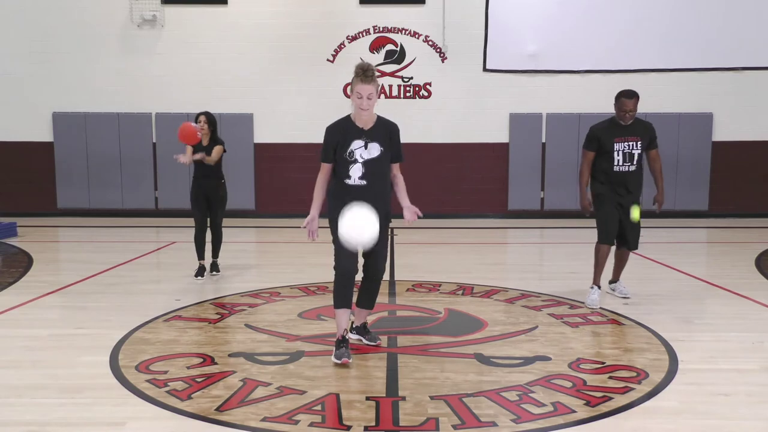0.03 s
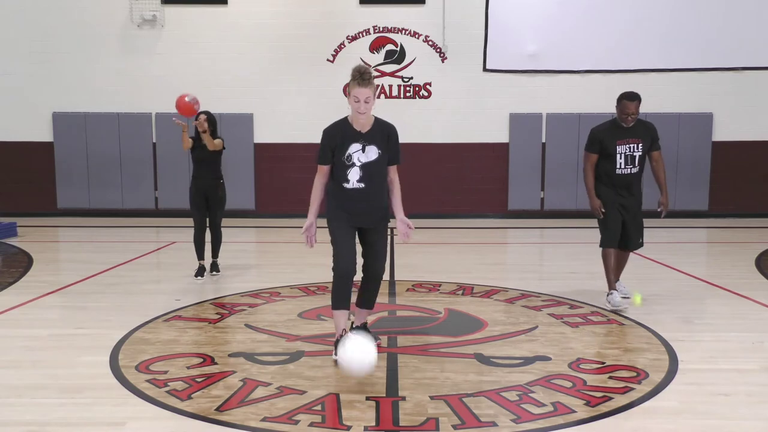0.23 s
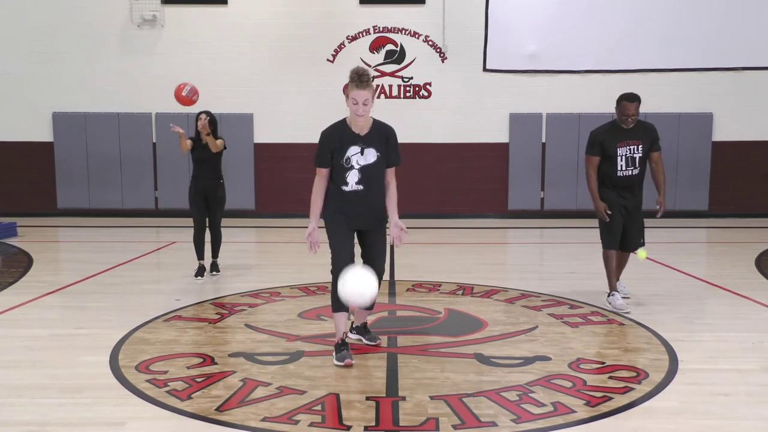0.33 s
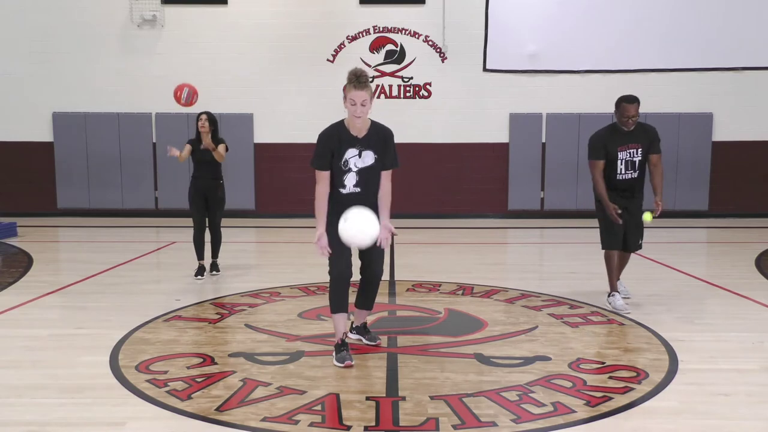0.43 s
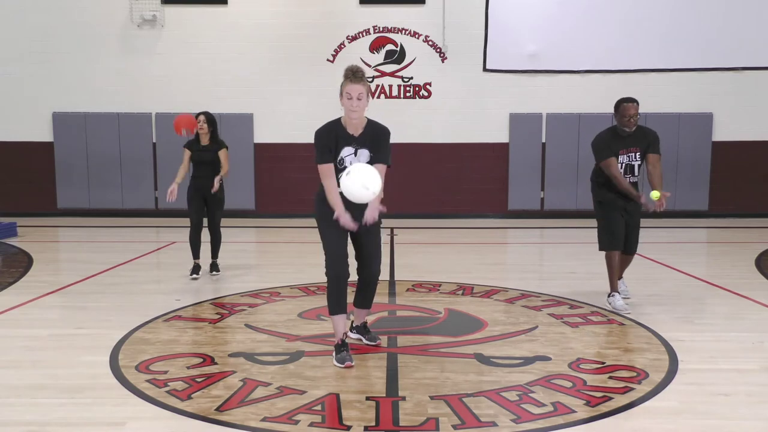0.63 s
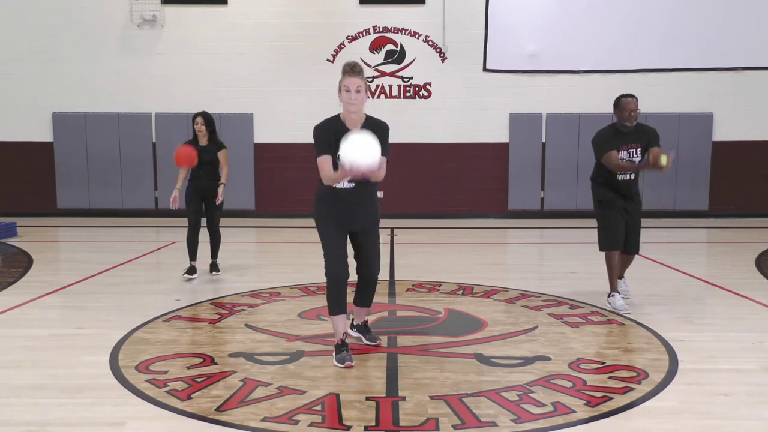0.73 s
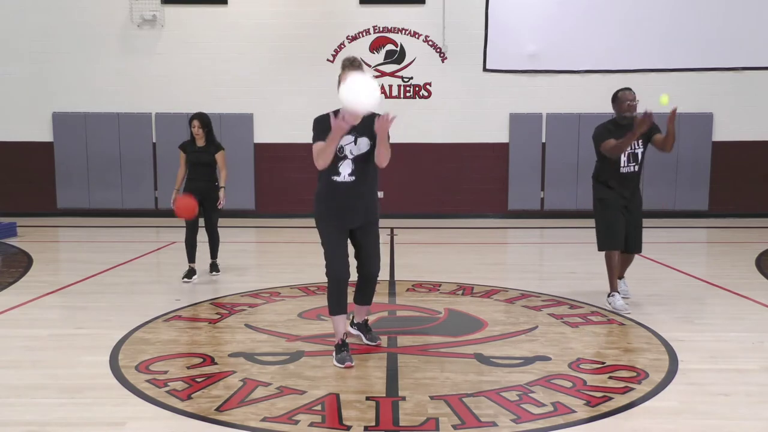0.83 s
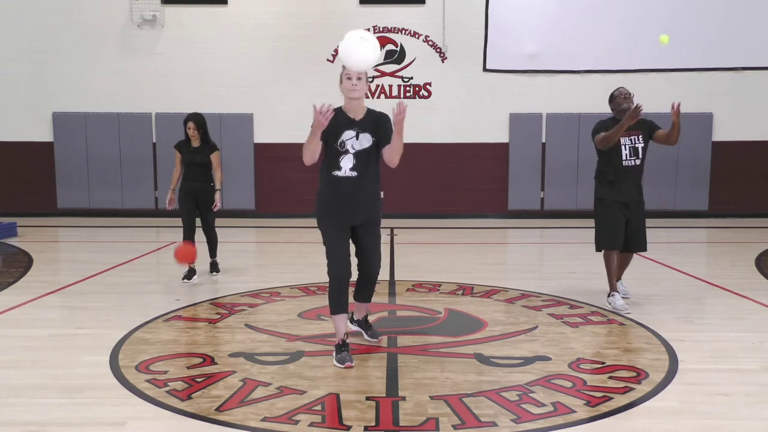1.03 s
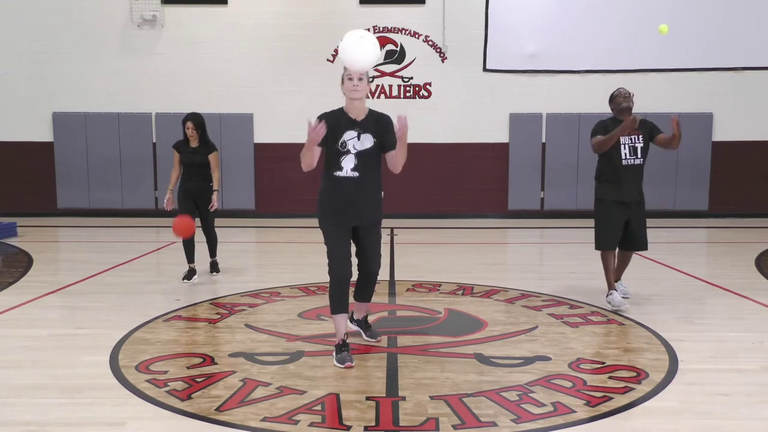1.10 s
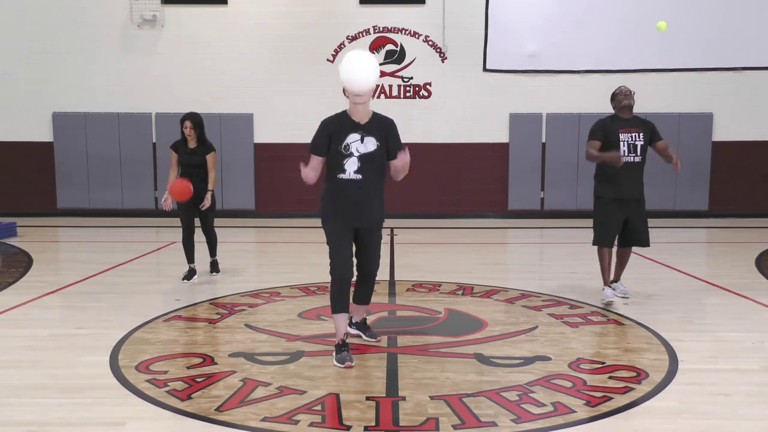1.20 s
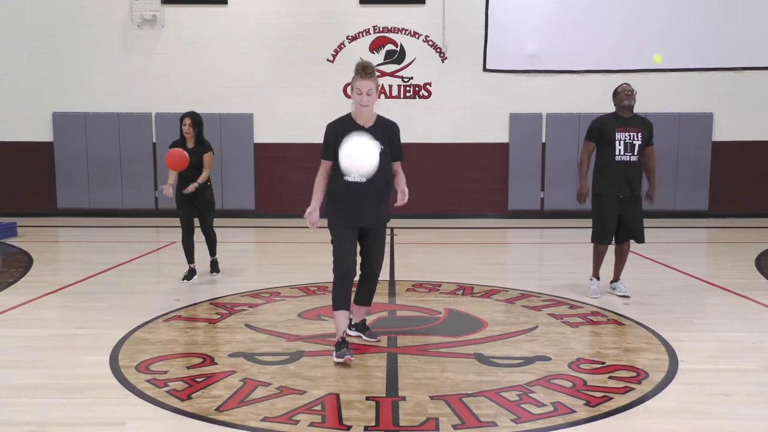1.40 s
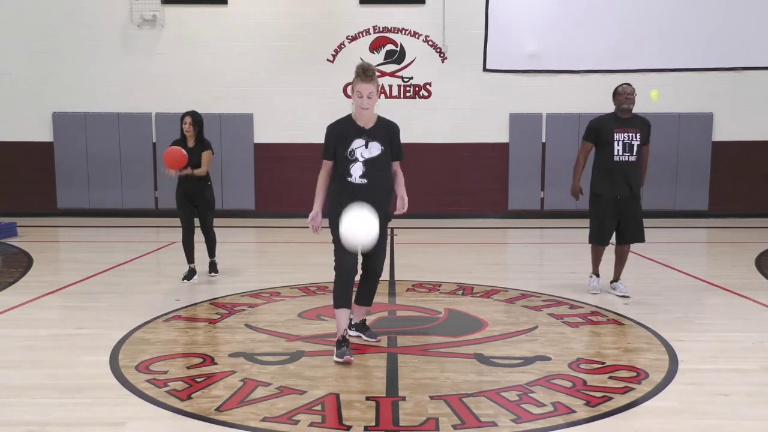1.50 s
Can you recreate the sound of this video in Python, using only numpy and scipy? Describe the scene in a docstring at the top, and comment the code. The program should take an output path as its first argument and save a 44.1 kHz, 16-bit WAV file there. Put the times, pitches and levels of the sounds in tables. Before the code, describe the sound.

Ball bounces in a large, echoing gym: a small tap runs straight into a loud, close thump, then a sharp two-handed catch near the microphone, and finally a deep, farther bounce with a long boomy tail.

```python
"""A gym hall hums faintly, with a hiss, short shoe squeaks and a very soft touch of a hand on a ball.
A small ball bounces on the sprung wooden floor, then at once a large near one; two hands catch a ball
close to the microphone, a far ball bounces, and a last soft touch follows.
Each blow is a noise crack plus fading tones. The hall adds slap echoes (smeared cracks), a low boom
(wavering tones and noise) and a wash (coloured noise that grows duller)."""
import sys
import numpy as np
from scipy import signal
from scipy.fft import rfft, irfft
from scipy.io import wavfile
from scipy.ndimage import uniform_filter1d

SR = 44100
rng = np.random.default_rng(int(sys.argv[2]) if len(sys.argv) > 2 else 0)


def output_pcm(signal):
    """Save a mono or channel-first signal as 16-bit PCM at the path in sys.argv[1].

    Samples are clipped to [-1, 1] before scaling.
    """
    pcm = np.clip(np.atleast_2d(signal).T, -1, 1) * 32767
    wavfile.write(sys.argv[1], SR, np.round(pcm).astype(np.int16))


N = 68355  # length of the scene [samples]

# Levels are those before the microphone. A crack level is a setting for the burst before its colour:
# crack() also scales the burst by how long it lasts.

# hall boom in four stretches, each a list of
# (time [s], middle level [dB], low level [dB], upper bass level [dB], middle pitch [Hz])
BOOM_STRETCHES = [
    [(0.0, -55.5, -60, -78, 139.2), (0.02, -50.5, -71, -62, 140.5), (0.032, -91, -68, -81, 138),
     (0.04, -75, -61, -75, 139), (0.064, -82, -65, -82, 137.4), (0.082, -95, -82, -95, 143),
     (0.092, -63, -64, -66, 143.5), (0.104, -61, -59, -60, 140), (0.114, -61, -87, -77, 145),
     (0.124, -85, -62.5, -65.5, 144), (0.156, -57.5, -68, -77, 141), (0.18, -68.5, -82, -66, 144)],
    [(0.25, -24.5, -61, -37.5, 137.7), (0.274, -41.5, -60, -53, 129.4), (0.31, -46.5, -50, -52, 150.8),
     (0.326, -44, -50, -64, 142), (0.346, -33.5, -54, -46.5, 145), (0.366, -55, -52, -49.5, 140.6),
     (0.39, -38, -33, -55.5, 148.2), (0.408, -33.5, -68, -51.5, 159.8), (0.428, -54.5, -53, -55.5, 153.6),
     (0.518, -34.5, -43.5, -52.5, 136.8), (0.558, -92, -59, -73, 127.8), (0.578, -60.5, -49, -50, 138),
     (0.596, -46.5, -53, -70.5, 145), (0.64, -55.5, -61, -55.5, 137)],
    [(0.71, -38.5, -59, -42.5, 157.3), (0.736, -54, -64, -67.5, 154), (0.776, -58.5, -49.5, -66, 135.7),
     (0.796, -79.5, -92, -80, 139), (0.814, -53, -67, -86, 149.8), (0.834, -65, -94, -83, 147),
     (0.852, -66.5, -87, -72, 150), (0.91, -70, -66, -100.5, 143)],
    [(1.015, -23, -27, -29.5, 136.1), (1.027, -45, -34.5, -63.5, 133.8), (1.049, -29, -33.5, -43, 140),
     (1.075, -45, -72, -49, 143.1), (1.097, -32, -52, -47.5, 154.5), (1.119, -39, -53, -55, 141.9),
     (1.155, -34, -46, -49, 132.6), (1.191, -68, -46, -54, 131.6), (1.225, -40.5, -64, -62, 133.5),
     (1.247, -77, -45, -52, 134.3), (1.277, -41.5, -64, -70, 142.5), (1.303, -61.5, -72, -69, 137),
     (1.333, -44.5, -55, -77, 146.2), (1.357, -60, -49, -58.5, 149.2), (1.383, -60, -58, -79, 132),
     (1.437, -49, -92, -58.5, 140.2), (1.463, -70.5, -54, -75, 137), (1.493, -58.5, -63, -64.5, 137),
     (1.521, -69, -70, -74.5, 141.7), (1.55, -56.5, -50, -61, 135)],
]
LOW_TONE_HZ, UPPER_BASS_HZ = 98.6, (185, 400)
BOOM_WANDER = .06  # typical pitch drift, as a share of the pitch
BOOM_NOISE_DB = -9.5  # noise beside each boom tone, compared with the tone

# hall wash in four stretches, each a list of (time [s], middle level [dB], treble level [dB])
WASH_STRETCHES = [
    [(0.0, -70, -85), (0.008, -68, -83), (0.084, -84.5, -100), (0.094, -79, -86), (0.102, -76.5, -102),
     (0.122, -76, -92), (0.162, -88, -94), (0.185, -74, -102)],
    [(0.24, -48, -48.5), (0.246, -38, -55), (0.282, -56, -59.5), (0.29, -51.5, -56), (0.322, -55.5, -64),
     (0.352, -50.5, -59.5), (0.368, -55.5, -65), (0.388, -50.5, -58.5), (0.444, -63.5, -70),
     (0.454, -53, -65), (0.484, -61.5, -74.5), (0.49, -55.5, -65), (0.522, -53.5, -64),
     (0.556, -67.5, -77.5), (0.65, -76.5, -93)],
    [(0.695, -27, -45), (0.727, -69.5, -66.5), (0.775, -68.5, -76.5), (0.857, -92.5, -107),
     (0.91, -98.5, -112)],
    [(1.004, -35.5, -48), (1.01, -43, -47), (1.06, -42.5, -49.5), (1.082, -48, -52.5), (1.09, -43.5, -49),
     (1.134, -52, -52.5), (1.142, -46.5, -51.5), (1.194, -56, -58), (1.232, -52.5, -60.5),
     (1.25, -59.5, -67.5), (1.278, -53.5, -62), (1.314, -65, -71.5), (1.33, -58, -69.5), (1.51, -74, -89)],
]
# colour of each wash at its start, relative within each band: (frequency [Hz], level [dB])
WASH_COLOURS = [
    [(250, -40), (420, -13.5), (684, 5.5), (829, -50), (895, -7.5), (1190, -4.5), (9000, -37.5),
     (11700, -79), (19800, -120)],
    [(250, -32), (420, -2.5), (746, -5.5), (871, -15.5), (974, -11), (2050, -7), (4820, -16.5),
     (11000, -37), (12000, -67), (15600, -121.5), (22000, -120)],
    [(250, -32), (420, -18.5), (702, -10.5), (949, -18), (1490, -7.5), (1820, -20.5), (3690, -19.5),
     (9130, -33), (15500, -50.5)],
    [(250, -38), (420, -19), (607, -3.5), (777, -7.5), (903, -5), (1400, -10.5), (6640, -19.5), (9470, -32),
     (11000, -67), (14300, -89), (22000, -120)],
]
# how fast each wash tilts towards the low end: one column (tilt [dB per second per kHz])
WASH_DULLING = [2.9, 14.5, 12., 15.6]
# fade-in of each wash before its first point: one column (time [s])
WASH_RISES = [.008, 0.034, 0.015, 0.0192]
WASH_FALL_S = 0.049
# the far ball's air ring, tilting the last wash within its band; a minus sign means a loss:
# (centre [Hz], half width [Hz], gain per second [dB/s])
FAR_AIR_RING = [(2120, 160, 41), (651, 34, 2), (2725, 42, -14.5)]
RIPPLE_DB, PATCH_DB = 1.2, 1.2  # unevenness over pitch only, and over pitch and time
HISS_DB = -102.

# faint shoe squeaks: (time [s], length [s], pitch [Hz], peak level [dB])
SHOE_SQUEAKS = [(.092, 0.022, 2770, -70.5), (.094, 0.022, 3900, -91), (.108, 0.063, 1890, -78),
                (.597, 0.023, 2114, -72)]

# soft touches of hand on ball: (time [s], ring peak [dB], crack level [dB])
TOUCH_BLOWS = [(.101, -54, -80), (1.5215, -45, -80)]
# tones of a touched ball, before the contact push: (pitch [Hz], level [dB], time to fade 60 dB [s])
TOUCH_TONES = [(150, -8, .04), (340, -2, .07), (600, 0, .05), (1020, 4, .04)]

# bounce of the small ball: (time [s], ring peak [dB], crack level [dB])
SMALL_BLOWS = [(.2062, -23.5, -41)]
# tones of the small ball, before the contact push: (pitch [Hz], level [dB], time to fade 60 dB [s])
SMALL_TONES = [(150, -0.5, .1), (330, -9, .03), (1280, -1, 0.03)]
# relative colour of the small ball's crack, also used for touches: (frequency [Hz], level [dB])
SMALL_CRACK_COLOUR = [(500, -12), (1200, 2.5), (3000, -17.5), (4500, -32.5), (9000, -71.5)]

# bounce of the large near ball: (time [s], ring peak [dB], crack level [dB])
NEAR_BLOWS = [(.2206, -4, -9.5)]
# tones of the near ball, before the contact push: (pitch [Hz], level [dB], time to fade 60 dB [s])
NEAR_TONES = [(156.6, 4, 0.025), (243, -10.5, 0.09), (357, 3, 0.031), (586, 2, 0.026), (796, 7.5, 0.0022),
              (1490, -4.5, 0.027), (1935, -2, 0.014), (2530, -22.5, 0.083), (3280, -18.5, 0.09)]
# relative colour of the near ball's crack: (frequency [Hz], level [dB])
NEAR_CRACK_COLOUR = [(880, -24.5), (1500, 1), (3510, 1.5), (4770, -11.5), (5610, -3.5), (7100, -10.5),
                     (11000, -37), (12200, -58), (13000, -84)]

# hands meeting the ball: (time [s], ring peak [dB], crack level [dB])
CATCH_BLOWS = [(.6738, -5.5, -14.5), (0.6862, -9, -10.5), (.7065, -39, -54)]
# tones of the caught ball, before the contact push: (pitch [Hz], level [dB], time to fade 60 dB [s])
CATCH_TONES = [(169.6, -14, 0.083), (262.4, 3, 0.013), (323, -2.5, 0.019), (612, 2, .03), (712, 7.5, 0.02),
               (929, -5, 0.059), (1321, 18, 0.017), (1594, -16, 0.012)]
# relative colour of the catching crack: (frequency [Hz], level [dB])
CATCH_CRACK_COLOUR = [(1180, -29.5), (2000, -16), (3180, -4.5), (3900, -1.5), (4790, 0.5), (6860, -11),
                      (7670, -6.5), (13800, -35.5), (15500, -45.5)]

# far bounce and its first return: (time [s], ring peak [dB], crack level [dB])
FAR_BLOWS = [(.9885, -10.5, -45), (.9958, -21, -63.5)]
# tones of the far ball, before the contact push: (pitch [Hz], level [dB], time to fade 60 dB [s])
FAR_TONES = [(118, 23.5, 0.02), (233, 2, 0.015), (367, 12.5, 0.038), (590, -23, 0.035), (956, -12, 0.01),
             (2130, -3.5, 0.036)]
# relative colour of the far ball's crack: (frequency [Hz], level [dB])
FAR_CRACK_COLOUR = [(1060, -33.5), (1800, -1.5), (2090, 4), (3870, 0.5), (4710, 1), (5910, 1), (6720, 2.5),
                    (9380, -18.5), (11000, -68), (14300, -95), (22000, -120)]

# slap echoes off floor and walls around the near bounce: (time [s], crack level [dB], smear [s])
NEAR_ECHOES = [(.2095, -50, 0.0064), (.2232, -33, .003), (.2282, -43.5, .0015), (.2395, -25.5, 0.00067),
               (.2435, -33, .0018), (.2525, -28.5, .0007), (.261, -41, .002), (.2905, -35.5, 0.00068)]
# slap echoes around the catch: (time [s], crack level [dB], smear [s])
CATCH_ECHOES = [(.678, -30.5, 0.0032), (.6915, -29.5, 0.0012), (.699, -42.5, 0.001)]
# slap echoes after the far bounce: (time [s], crack level [dB], smear [s])
FAR_ECHOES = [(.9982, -30, .002), (1.0065, -31, .0015), (1.0102, -29, .002), (1.0162, -24, .0007),
              (1.0298, -25, .0007), (1.0466, -25, .001), (1.0502, -31, .0008), (1.0586, -31, .0008),
              (1.0898, -34, .0012)]

CONTACT_S, FAR_CONTACT_S = .0003, .001  # time for the contact push to reach its peak
INTO_FLOOR, INTO_HAND = -1, 1  # which way round the ring's waveform goes
CRACK_SIZE, CRACK_START = 2048, 128  # samples in a crack, and samples before its burst starts
MIC_LOW_HZ, EDGE_HZ = 78, 15640  # bass and treble limits of the microphone


def amp(db):
    """Turn decibels into a gain."""
    return 10 ** (np.asarray(db) / 20)


def evened(x):
    """Scale a signal to an average (RMS) strength of 1."""
    return x / np.sqrt(np.mean(x ** 2) + 1e-30)


def read(points, hz):
    """Read a colour curve, joining its points by straight lines over log frequency."""
    f, value = np.transpose(points)
    return np.interp(np.log(hz + 1), np.log(f + 1), value)


def add(mix, s, sound):
    """Lay a sound into the mix at a time in seconds."""
    part = mix[round(s * SR):][:len(sound)]
    part += sound[:len(part)]


def level(rows, rise_s, fall_s, column=1):
    """Gain along a level curve, fading in before its first point and out after its last."""
    points, t = np.array(rows), np.arange(N) / SR
    s, db = points[:, 0], points[:, column]
    fade_in = np.clip((t - s[0]) / rise_s + 1, 0, 1)
    fade_out = np.clip((s[-1] - t) / fall_s + 1, 0, 1)
    return fade_in * fade_out * amp(np.interp(t, s, db))


def smooth_noise(length):
    """Slow random drift: noise averaged twice over 400 samples."""
    once = uniform_filter1d(rng.standard_normal(length), size=400)
    return evened(uniform_filter1d(once, size=400))


def wandering(hz):
    """A tone whose pitch drifts at random."""
    drifting_hz = hz * (1 + BOOM_WANDER * smooth_noise(N))
    return np.sqrt(2) * np.sin(2 * np.pi * np.cumsum(drifting_hz) / SR)


def band(lo_hz, hi_hz):
    """Noise kept between two frequencies."""
    sos = signal.butter(3, [lo_hz, hi_hz], "band", fs=SR, output="sos")
    return evened(signal.sosfilt(sos, rng.standard_normal(N)))


def boom():
    """The hall's low modes beat: two wandering tones with narrow noise, and a noise band above."""
    out, t = np.zeros(N), np.arange(N) / SR
    for rows in BOOM_STRETCHES:
        points = np.array(rows)
        middle_hz = np.interp(t, points[:, 0], points[:, 4])
        middle = evened(wandering(middle_hz) + amp(BOOM_NOISE_DB) * band(150, 240))
        low = evened(wandering(LOW_TONE_HZ) + amp(BOOM_NOISE_DB) * band(55, 130))
        out += level(rows, .01, .015) * middle
        out += level(rows, .01, .0067, column=2) * low
        out += level(rows, .015, .036, column=3) * band(*UPPER_BASS_HZ)
    return out


def air_ring_gain(hz, elapsed):
    """The far ball's air ring: bell-shaped pitch regions that gain or lose strength over time."""
    db_per_s = sum(db / (1 + ((hz - f) / width) ** 2) for f, width, db in FAR_AIR_RING)
    return amp(np.outer(db_per_s, elapsed))


def wash():
    """Dense reflections: coloured noise, rippled and patchy, whose higher pitches fade faster."""
    out = np.zeros(N)
    for rows, colour, dulling, rise_s in zip(WASH_STRETCHES, WASH_COLOURS, WASH_DULLING, WASH_RISES):
        hz, t, z = signal.stft(rng.standard_normal(N), SR, nperseg=512, noverlap=384)
        elapsed = np.maximum(t - rows[0][0], 0)
        gain = amp(read(colour, hz)[:, None] - dulling * np.outer(hz / 1000, elapsed))
        if rows is WASH_STRETCHES[-1]:
            gain = gain * air_ring_gain(hz, elapsed)
        patches = uniform_filter1d(rng.standard_normal(z.shape), size=3, axis=0)
        patches = evened(uniform_filter1d(patches, size=8, axis=1))
        ripple = rng.standard_normal((len(hz), 1))
        z = z * amp(PATCH_DB * patches + RIPPLE_DB * ripple)
        middle, treble = (hz > 420) & (hz < 2500), hz >= 2500
        for column, part in ((1, middle), (2, treble)):
            shaped = gain * part[:, None]
            shaped = shaped / np.sqrt((shaped ** 2).mean(0))  # the level curve alone sets the strength
            noise = signal.istft(z * shaped, SR, nperseg=512, noverlap=384)[1][:N]
            out += level(rows, rise_s, WASH_FALL_S, column) * evened(noise)
    return out


def hiss():
    """Steady, very faint white noise."""
    return amp(HISS_DB) * rng.standard_normal(N)


def squeaks():
    """Shoe squeaks: short tones of wavering pitch that swell and fade."""
    out = np.zeros(N)
    for s, length, hz, db in SHOE_SQUEAKS:
        t = np.arange(0, length, 1 / SR)
        drift = evened(uniform_filter1d(rng.standard_normal(N), size=200))[:len(t)]
        tone = np.sin(2 * np.pi * np.cumsum(hz * (1 + .012 * drift)) / SR)
        add(out, s, amp(db) * np.sin(np.pi * t / length) * tone)
    return out


def crack(colour, rise_s, decay_s):
    """A noise burst with a quick rise and a fading tail, then coloured."""
    t = np.maximum(np.arange(CRACK_SIZE) - CRACK_START, 0) / SR
    shape = np.minimum(t / rise_s, 1) * np.exp(-np.maximum(t - rise_s, 0) / decay_s)
    gain = amp(read(colour, np.fft.rfftfreq(CRACK_SIZE, 1 / SR)))
    burst = irfft(rfft(rng.standard_normal(CRACK_SIZE) * shape) * gain, CRACK_SIZE)
    burst = burst * signal.windows.tukey(CRACK_SIZE, .12)  # soft ends
    return evened(burst) * np.sqrt(np.mean(shape ** 2)) / 2


def blows(rows, tones, colour, sign, contact_s, lead_s, rise_s, decay_s):
    """A skin crack, and a contact push that sets fading tones ringing; lead_s puts the crack ahead."""
    t = np.arange(0, .15, 1 / SR)
    hz, db, t60 = np.transpose(tones)[:, :, None]
    ring = (amp(db - 60 * t / t60) * np.sin(2 * np.pi * hz * t)).sum(0)
    push = t * np.exp(-t / contact_s)
    ring = signal.fftconvolve(ring, push)[:len(t)]
    ring = ring / abs(ring).max()
    out = np.zeros(N)
    for s, ring_db, crack_db in rows:
        add(out, s, sign * amp(ring_db) * ring)
        add(out, s - lead_s - CRACK_START / SR, amp(crack_db) * crack(colour, rise_s, decay_s))
    return out


def touches():
    """A hand on a ball: very faint tones and a crack that rises and fades slowly."""
    return blows(TOUCH_BLOWS, TOUCH_TONES, SMALL_CRACK_COLOUR, INTO_HAND, CONTACT_S,
                 lead_s=.00029, rise_s=.00085, decay_s=.0052)


def small_bounce():
    """The small ball hits the floor: a soft crack just ahead of a few tones."""
    return blows(SMALL_BLOWS, SMALL_TONES, SMALL_CRACK_COLOUR, INTO_FLOOR, CONTACT_S,
                 lead_s=.0005, rise_s=.00017, decay_s=.0016)


def slaps():
    """Floor and walls send the cracks back as smeared bursts."""
    out = np.zeros(N)
    groups = ((NEAR_ECHOES, NEAR_CRACK_COLOUR), (CATCH_ECHOES, CATCH_CRACK_COLOUR),
              (FAR_ECHOES, FAR_CRACK_COLOUR))
    for rows, colour in groups:
        for s, db, smear in rows:
            add(out, s - CRACK_START / SR, amp(db) * crack(colour, smear / 2, smear))
    return out


def near_bounce():
    """The large near ball hits the floor: a very short crack, then a strong ring."""
    return blows(NEAR_BLOWS, NEAR_TONES, NEAR_CRACK_COLOUR, INTO_FLOOR, CONTACT_S,
                 lead_s=.0009, rise_s=.00015, decay_s=.0007)


def catch():
    """Hands stop the ball: close cracks, each just ahead of a short ring."""
    return blows(CATCH_BLOWS, CATCH_TONES, CATCH_CRACK_COLOUR, INTO_HAND, CONTACT_S,
                 lead_s=.0013, rise_s=.00034, decay_s=.0015)


def far_bounce():
    """The far ball and its first return: a slower push favours low tones; the crack comes after."""
    return blows(FAR_BLOWS, FAR_TONES, FAR_CRACK_COLOUR, INTO_FLOOR, FAR_CONTACT_S,
                 lead_s=-.0027, rise_s=.00098, decay_s=.0011)


def scene():
    """Add the hall, the squeaks and the blows into one channel."""
    hall = boom() + wash() + hiss() + slaps()
    balls = touches() + small_bounce() + near_bounce() + catch() + far_bounce()
    return (hall + squeaks() + balls)[None]


def record(dry):
    """The small microphone drops the deep bass; then the highest treble is cut off."""
    bass_cut = signal.butter(4, MIC_LOW_HZ, "high", fs=SR, output="sos")
    thin = signal.sosfilt(bass_cut, dry)
    treble_cut = signal.firwin(511, EDGE_HZ, window=("kaiser", 9), fs=SR)
    return signal.oaconvolve(thin, treble_cut[None], "same")


dry = scene()
out = record(dry)
output_pcm(out)
```